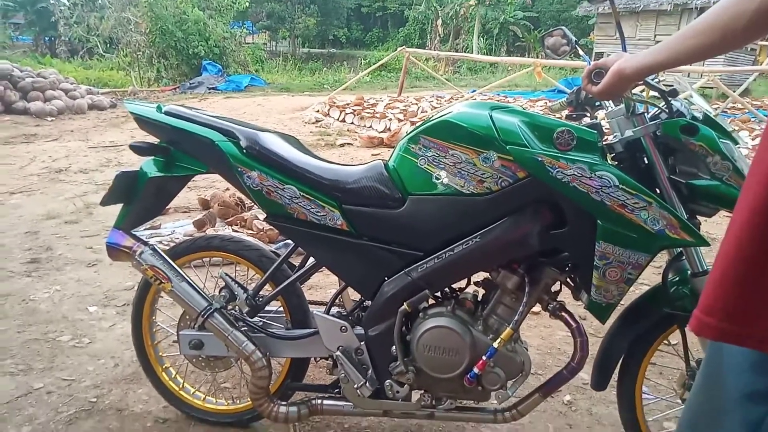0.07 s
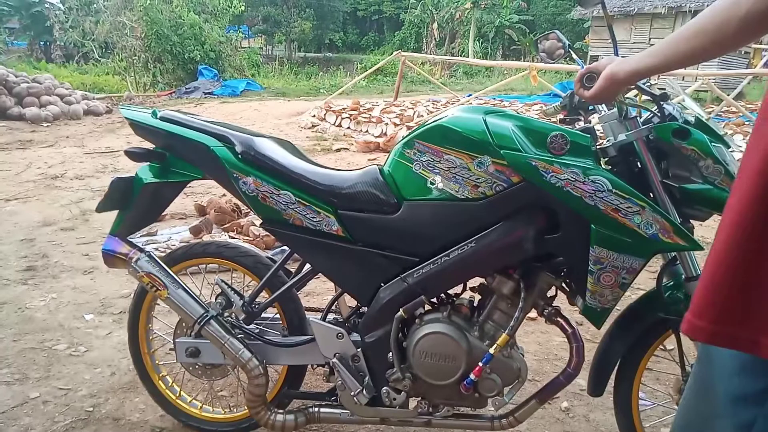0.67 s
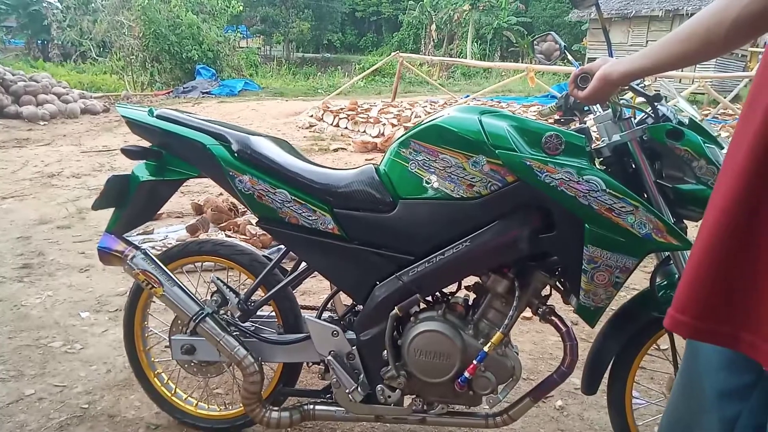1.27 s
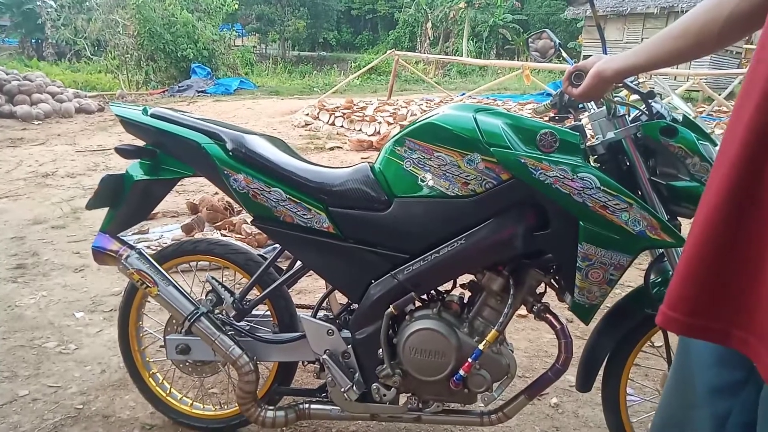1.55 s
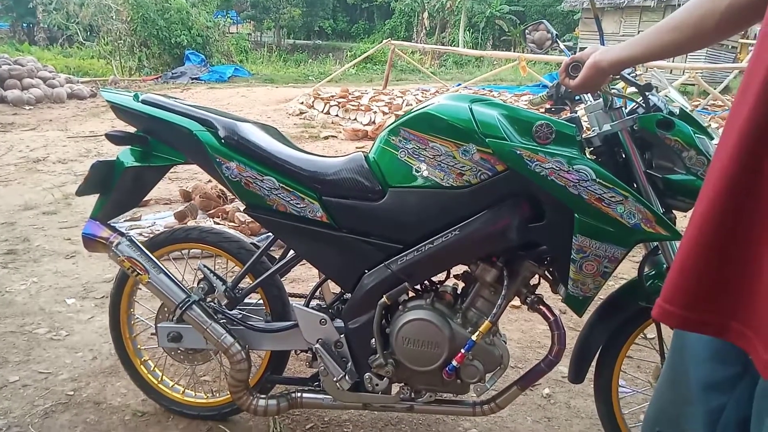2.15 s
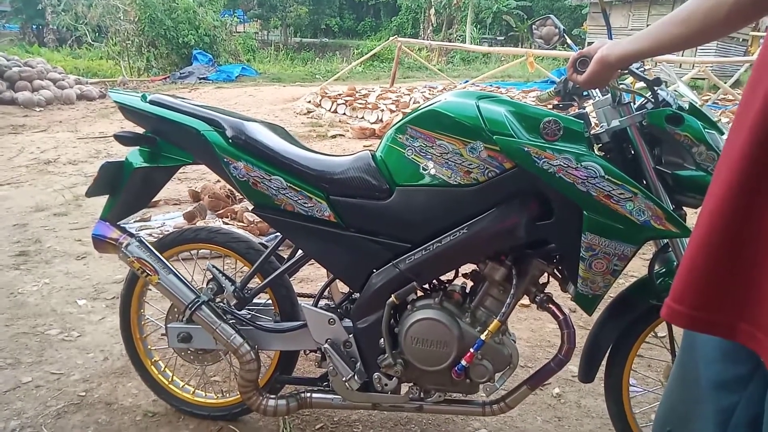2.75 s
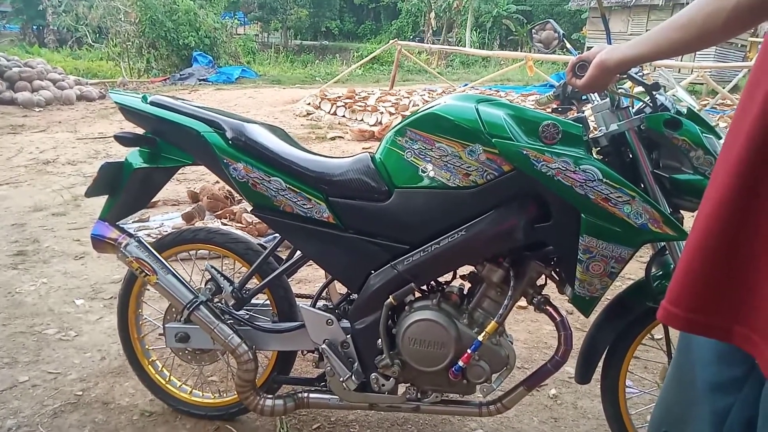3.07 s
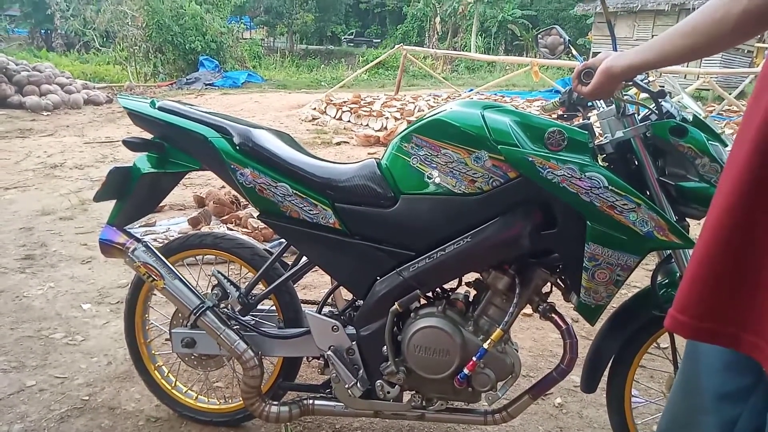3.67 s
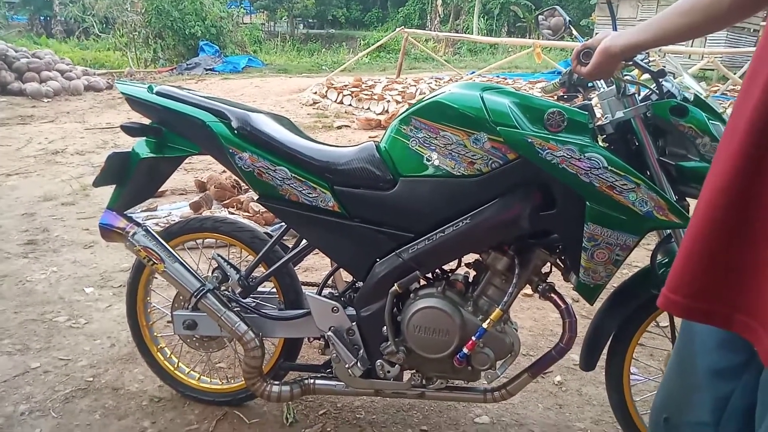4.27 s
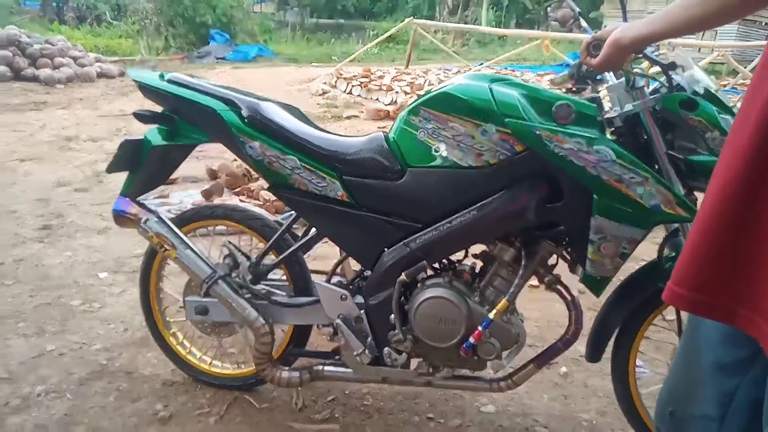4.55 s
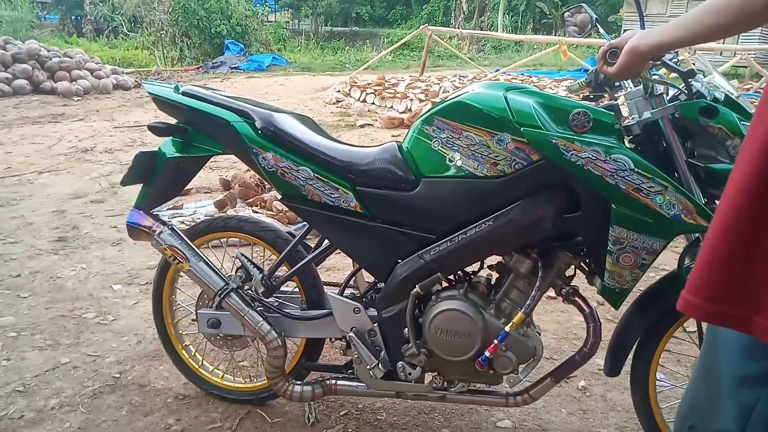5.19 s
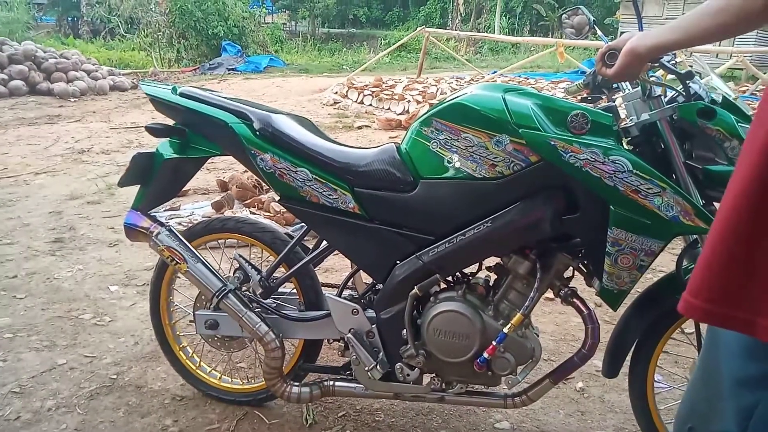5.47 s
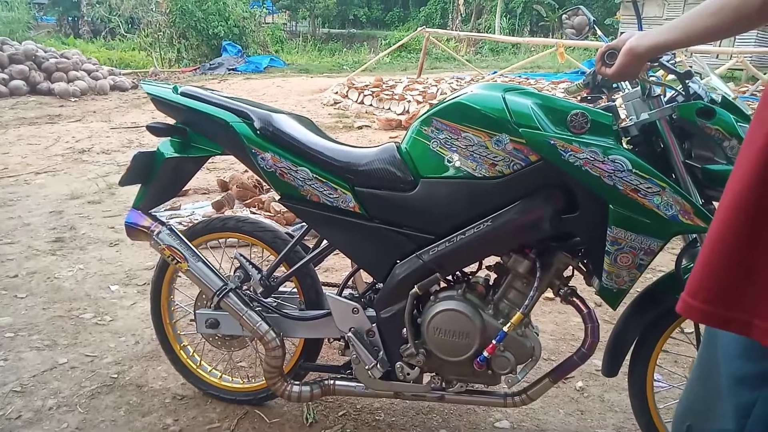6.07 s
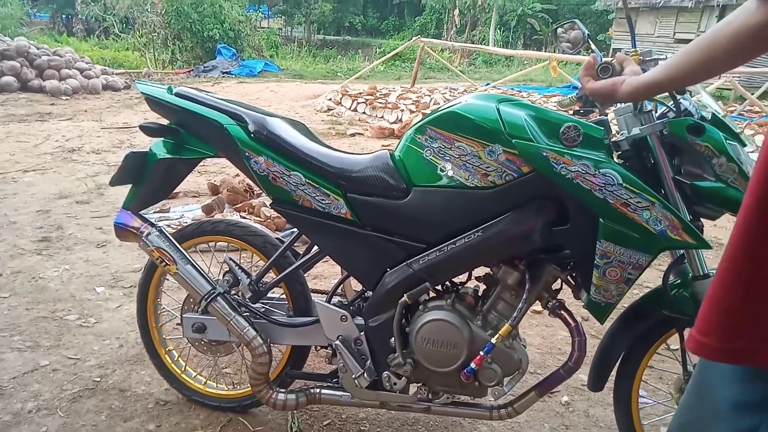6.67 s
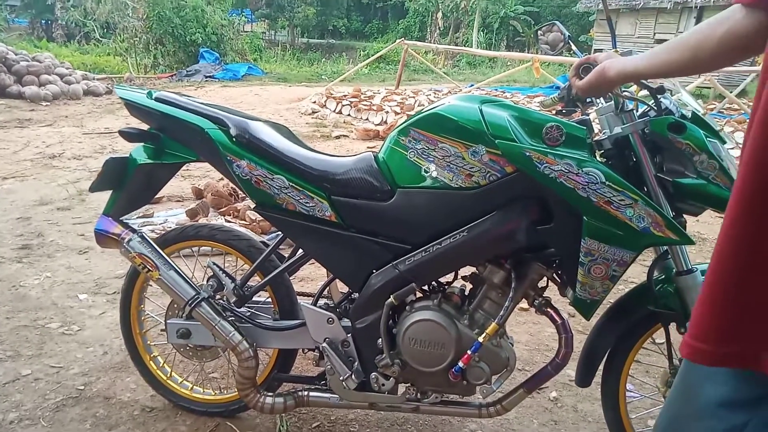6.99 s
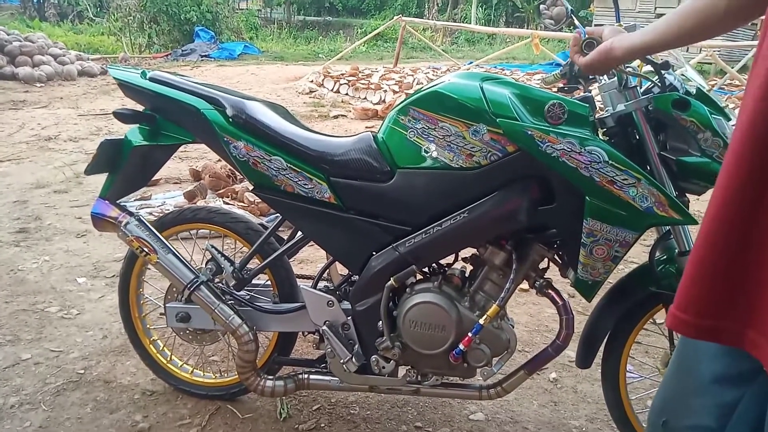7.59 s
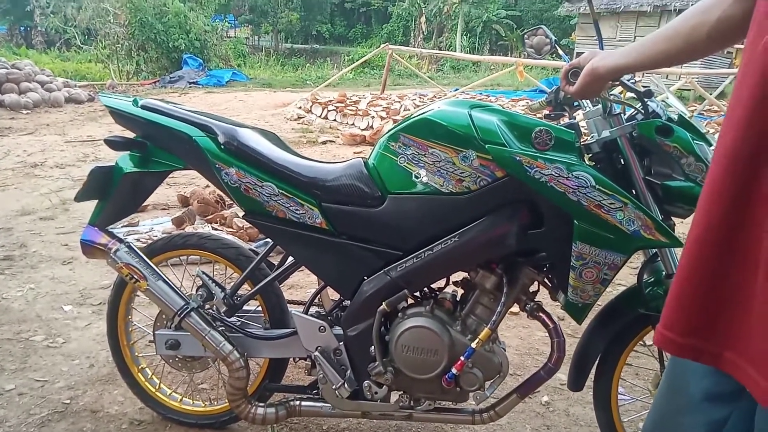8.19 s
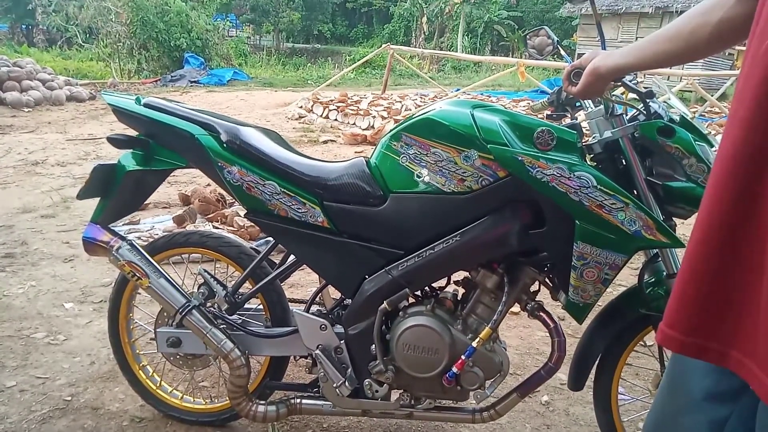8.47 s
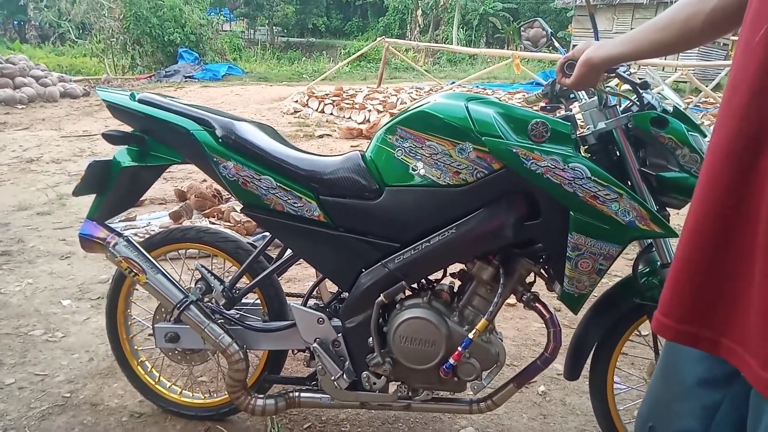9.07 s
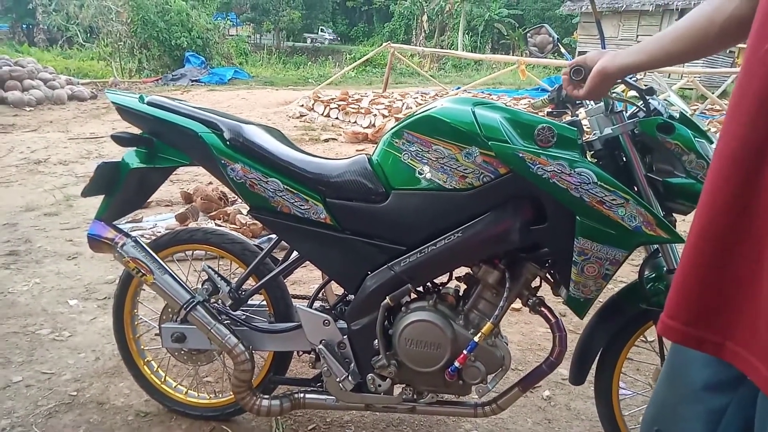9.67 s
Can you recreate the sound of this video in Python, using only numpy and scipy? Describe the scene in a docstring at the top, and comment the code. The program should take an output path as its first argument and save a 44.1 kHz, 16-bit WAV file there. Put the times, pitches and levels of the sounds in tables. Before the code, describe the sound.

A single-cylinder motorcycle idles loudly through an open exhaust, a few steps away in an outdoor yard with slight, short reflections. From the start it has a loping beat of about twelve hard bangs a second, each with a hollow pipe ring and a sharp, slightly metallic crack. Soft puffs fall between them, over a faint mechanical rustle. The pace creeps up until about 6.4 seconds, when the bangs stop and the engine coasts on duller puffs. At about 7 seconds the throttle is blipped once, a quick, harsh, raspy rev peaking near 7.2 seconds. The revs then fall with a crackling, popping burble until around 8 seconds. The loping idle returns just after that and holds until roughly 9.5 seconds, when the engine slows into softer puffs again, up to the end near 10 seconds.

```python
"""A loud, loping motorcycle idle in a yard: one cylinder banging through an open exhaust.
It fires only every other cycle. Each bang rings the pipe and returns from its far end as a sharp
crack; unfired cycles give soft puffs, with a mechanical rustle underneath. The engine coasts, is
blipped once, burbles down on the overrun as the pipe cools, lopes again and coasts once more."""
import sys
import numpy as np
from scipy import signal
from scipy.fft import rfft, irfft, next_fast_len
from scipy.io import wavfile
from scipy.ndimage import uniform_filter1d, minimum_filter1d

SR = 44100
rng = np.random.default_rng(int(sys.argv[2]) if len(sys.argv) > 2 else 0)


def write(x):
    x = np.atleast_2d(x).T
    wavfile.write(sys.argv[1], SR, np.round(np.clip(x, -1, 1) * 32767).astype(np.int16))


N = 433944

# Engine speed. Each row: time in seconds, four-stroke cycles per second.
ENGINE_SPEED = [(0.0, 23.91), (0.65, 23.74), (1.59, 23.17), (1.81, 23.91), (2.65, 23.85), (3.5, 24.92),
                (4.45, 24.75), (5.39, 26.42), (6.36, 27.66), (6.93, 18.77), (7.05, 26.88), (7.17, 41.25),
                (7.27, 41.9), (7.84, 30.35), (7.85, 28.5), (8.3, 23.2), (8.48, 25.16), (9.13, 25.57),
                (9.43, 25.4), (9.84, 19.13)]
# How far the throttle is open. Each row: time in seconds, added harshness in dB.
THROTTLE_OPENING = [(6.95, 0.5), (7.05, 5), (7.13, 11), (7.17, 20), (7.23, 10), (7.5, 3), (7.85, 5),
                    (8, 1.5)]
# Standing waves of the pipe. Each row: pitch in Hz, relative level in dB, t60 in seconds.
PIPE_MODES = [(73.3, -36, 0.16), (167.83, -12, 0.21), (242, -20.5, 0.12), (280.5, -24, 0.19),
              (345.2, -30, 0.22), (447.2, -18.5, 0.12), (478.5, -18, 0.12), (554.8, -13, 0.057),
              (657, -11, 0.052), (747.4, -30.5, 0.38), (769.2, -13, 0.11), (822.6, -31.5, 0.39)]
# Ringing of the silencer can. Each row: pitch in Hz, relative level in dB, t60 in seconds.
CAN_MODES = [(1010, -34, 0.045), (1253.4, -21.5, 0.071), (1366, -38, .16), (1490, -44.5, 0.053),
             (1565, -40, .16), (1701, -18, 0.019), (1775, -34, 0.11), (1910, -24.5, 0.033),
             (2014, -47, 0.25), (2076, -18.5, .012), (2227, -39.5, 0.047)]


def amp(db):
    """Decibels to gain."""
    return 10 ** (np.asarray(db) / 20)


def unit_rms(x):
    """Scales to rms 1."""
    return x / np.sqrt(np.mean(x ** 2) + 1e-20)


def curve_at(rows, at):
    """Value of a two-column curve at the given times."""
    return np.interp(at, *np.transpose(rows))


def colour(x, points):
    """Equalises by a curve of (Hz, dB) points."""
    size = next_fast_len(len(x) + 4096)
    hz, db = np.transpose(points)
    gain = amp(np.interp(np.log(np.fft.rfftfreq(size, 1 / SR) + 1), np.log(hz), db))
    return irfft(rfft(x, size) * gain, size)[:len(x)]


def lowpass(x, hz, order):
    """Rolls off the treble."""
    return signal.sosfilt(signal.butter(order, min(hz, SR / 2 - 1), fs=SR, output="sos"), x)


def add(mix, start_s, sound):
    """Mixes a sound in at start_s."""
    at = round(start_s * SR)
    part, sound = mix[max(at, 0):], sound[max(-at, 0):]
    part[:len(sound)] += sound[:len(part)]


def ring(modes, t):
    """Damped modes set going at t = 0."""
    hz, db, t60 = np.float32(modes).T[:, :, None]
    t = np.float32(np.maximum(t, 0))
    return (amp(db) * np.exp(-float(np.log(1000)) * t / t60) * np.sin(2 * np.pi * hz * t)).sum(0)


def crank():
    """Time, and the cycles that the engine has turned by then."""
    t = np.arange(-SR // 10, N, 20) / SR
    return t, np.cumsum(curve_at(ENGINE_SPEED, t)) * (t[1] - t[0])


def cycle_times(first_s, last_s, every):
    """Moments from first_s to last_s, about `every` engine cycles apart."""
    t, turns = crank()
    first, last = np.interp([first_s, last_s], t, turns)
    return np.interp(np.linspace(first, last, round((last - first) / every) + 1), turns, t)


def firings():
    """All the bangs. Each row: start in seconds, blow in dB, returning crack in dB."""
    # Runs of loping idle. Each row: first and last bang in seconds, blow in dB, crack in dB.
    lopes = [(-.003, 2.0278, .9, -1.5), (2.0882, 4.6218, .9, -.7), (4.7402, 4.7402, 1.5, -5),
             (4.8566, 4.9356, 1.3, 1.5), (5.0515, 6.3932, 1.4, -.5), (8.1368, 8.7916, 0, -2.5),
             (8.9096, 9.4595, .5, -2)]
    # The throttle blip: one row of the same kind.
    blip = (6.9665, 7.189, 1, -2)
    runs = [(cycle_times(*lope[:2], every=2), lope) for lope in lopes]
    runs.append((cycle_times(*blip[:2], every=1), blip))
    return np.array(sorted((s, *run[2:]) for times, run in runs for s in times))


def puff_times():
    """Every unfired cycle, between the bangs and after the last one."""
    t, turns = crank()
    fired = np.interp(firings()[:, 0], t, turns)
    between = [np.linspace(a, b, max(round(b - a), 1) + 1)[1:-1] for a, b in zip(fired, fired[1:])]
    coasting = np.arange(fired[-1] + 1, turns[-1])
    return np.interp(np.concatenate(between + [coasting]), turns, t)


def yard(x, wet_db=-8, t60=.15, echoes_per_s=2500):
    """Scattered reflections from the ground, the bike and nearby walls."""
    # Tone of the reflections. Each row: frequency in Hz, gain in dB.
    echo_eq = [(100, -21), (600, -4.5), (1200, -12.5), (2200, -13.5), (3500, 3), (6000, -23)]
    t = np.arange(SR // 4) / SR
    echoes = rng.standard_normal(len(t)) * (rng.random(len(t)) < echoes_per_s / SR)
    echoes *= (t > .002) * amp(-60 * t / t60)
    wet = signal.fftconvolve(x, echoes / np.linalg.norm(echoes))[:N]
    return amp(wet_db) * colour(wet, echo_eq)


def clatter(level_db=-44, valve_delay_s=.022, fade_s=.0067):
    """Mechanical rustle of the engine, swelling a little as a valve shuts in every cycle."""
    # Tone of the rustle. Each row: frequency in Hz, gain in dB.
    rustle_eq = [(30, -12), (100, 4), (700, 3.5), (1000, -8.5), (2000, -7), (3400, -10.5), (5000, -24.5),
                 (5700, -35.5), (6400, -28), (7200, -29.5), (10000, -37), (15000, -37)]
    t, swell = np.arange(SR // 20) / SR, np.ones(N)
    times = np.r_[firings()[:, 0], puff_times()]
    for s, size in zip(times, rng.random(len(times))):
        add(swell, s + valve_delay_s, size * np.exp(-t / fade_s))
    return amp(level_db) * unit_rms(swell * colour(rng.standard_normal(N), rustle_eq))


def ticks(level_db=16, fade_s=.0007):
    """Thin, bright ticks of noise riding on some of the cracks."""
    # Each row: start in seconds, relative level in dB.
    hits = [(0.5003, -46), (0.9218, -46), (1.1777, -45), (1.8607, -44), (2.0403, -35), (2.2662, -42),
            (2.3496, -46), (2.7574, -45), (3.5848, -43), (3.6656, -43), (3.9873, -44), (4.1495, -49),
            (4.2208, -44), (4.8663, -44), (5.9658, -45), (8.2297, -47)]
    t, out = np.arange(SR // 200) / SR, np.zeros(N)
    for s, db in hits:
        add(out, s, amp(db + level_db) * rng.standard_normal(len(t)) * np.exp(-t / fade_s))
    return lowpass(out, 9000, order=1)


def blowdown(t, dull_db, tuning, uneven_db, flow, push_s=.000887):
    """A short push of gas leaves the pipe, whose standing waves then swing the other way."""
    hz, db, t60 = np.transpose(PIPE_MODES)
    db = db - dull_db * np.log2(hz / hz[1]) + uneven_db  # dull_db is a loss per octave
    t60 = t60 / (1 + abs(flow) * (hz / hz[-1]))  # streaming gas damps the upper waves
    waves = ring(np.transpose([hz * tuning, db, t60]), t - push_s)
    push = .49 * amp(-2 * max(dull_db, 0)) * np.sin(np.pi * np.minimum(t / push_s, 1))
    build_up = 1 - np.exp(-np.maximum(t - push_s, 0) / .00036)
    return push - waves * build_up


def pipe_crack(t, trip_s=.01119, width_s=.00021):
    """A wave runs the pipe, steepens to a spike and rings the can after trip_s."""
    late = t - trip_s
    spike = .56 / (1 + (late / width_s) ** 2) ** 2
    return spike + ring(CAN_MODES, late)


def gust(t, crack_db, trip_s=.011, fade_s=.031, flare_s=.012, flare_db=9):
    """Envelope of the turbulent jet: it starts with the blow and flares with the returning wave."""
    flare = amp(flare_db + crack_db) * (t > trip_s) * np.exp(-abs(t - trip_s) / flare_s)
    return (np.exp(-t / fade_s) + flare) * (1 - np.exp(-t / .0004))


def puffs(t, idle_hz=25, cool_s=.55, cold_sag=.115, flow=2.2, rasp_db=-7, burble_db=-29):
    """Unfired cycles, duller when the engine is slow and the pipe cold: pipe sound and jet envelope."""
    # Strength of the puffs. Each row: time in seconds, blow in dB.
    puff_levels = [(0, -8), (6.38, -7.5), (6.46, -.5), (6.7, -4.5), (6.9, -1.5), (7.22, -6.5), (7.55, -3.5),
                   (7.9, 1.5), (8.12, -6.5), (9.45, -4), (9.84, -1.5)]
    # Unburnt fuel catching in the pipe, faint but for the overrun. Each row: time in seconds, gain in dB.
    late_burns = [(7.17, -29), (7.22, -11), (7.3, -6.5), (7.42, -7), (7.54, -11), (7.68, -1.5), (7.85, 1),
                  (7.92, -16), (8.1, -29)]
    # Tone of the churning gas. Each row: frequency in Hz, gain in dB.
    burble_eq = [(40, -17), (65, 10), (110, 0.5), (220, 2.5), (400, -4), (800, -9), (950, -31), (3000, -49)]
    pipe, jet, churn = np.zeros((3, N))
    fired, hz = firings()[:, 0], np.array(PIPE_MODES)[:, 0]
    crack = amp(-2.5) * pipe_crack(t, trip_s=.0004)
    swirl = gust(t, crack_db=-3)
    for s in puff_times():
        uneven_db = rng.standard_normal(len(hz))
        stray, detune = rng.standard_normal(2)
        blow_db, burn_db = curve_at(puff_levels, s), curve_at(late_burns, s)
        speed = curve_at(ENGINE_SPEED, s)
        cold = min((s - fired[fired < s][-1]) / cool_s, 1)  # the gas cools after the last bang
        dull_db = 4.5 - 8.5 * np.log2(speed / idle_hz) + 2 * cold
        slack = np.clip(dull_db / 6, 0, 1)  # dull puffs are rounder, less even and churn more
        sag = cold_sag * cold * np.minimum(hz[1] / hz, 1)  # the deep waves drop most in pitch
        tuning = 1 - sag + .025 * slack * detune
        puff = blowdown(t, dull_db, tuning, slack * uneven_db, flow)
        add(pipe, s, amp(blow_db) * lowpass(puff, 2000 / (1 + 3.8 * slack), order=2))
        # half a cycle on, a late burn cracks and rings the pipe again
        rebound = amp(-3) * blowdown(t, -1.2, tuning, slack * uneven_db, flow)
        add(pipe, s + .5 / speed + .0002 * stray, amp(burn_db) * (rebound + crack))
        add(jet, s, amp(rasp_db + burn_db + curve_at(THROTTLE_OPENING, s)) * swirl)
        add(churn, s, slack * amp(blow_db) * swirl)
    burble = amp(burble_db) * churn * unit_rms(colour(rng.standard_normal(N), burble_eq))
    return pipe + burble, jet


def bangs(t, blow_spread_db=.7, crack_spread_db=1.8, slap_db=-20, roar_db=-28, roar_s=.007):
    """Hard firings, thinner, brighter and drier on an open throttle: pipe sound and jet envelope."""
    pipe, jet = np.zeros((2, N))
    # the returning wave also rings the upper pipe modes a second time
    second_ring = blowdown(np.maximum(t - .0105, 0), dull_db=-2, tuning=1, uneven_db=0, flow=1)
    crack = pipe_crack(t) + amp(-13) * second_ring
    can_slap = ring(CAN_MODES, t - .001)  # the first push already slaps the can
    for s, blow_db, crack_db in firings():
        detune, hard, sharp = rng.standard_normal(3)  # no two firings burn alike
        uneven_db = rng.standard_normal(len(PIPE_MODES))
        open_db = curve_at(THROTTLE_OPENING, s)
        blow_db += blow_spread_db * hard - .15 * open_db
        crack_db += crack_spread_db * sharp - .4 * open_db
        blow = blowdown(t, dull_db=1 - .3 * open_db, tuning=1 + .014 * detune,
                        uneven_db=uneven_db, flow=.25 + .2 * open_db)
        blow += amp(slap_db + open_db) * can_slap
        gas_roar = amp(roar_db + open_db) * np.exp(-t / roar_s) * rng.standard_normal(len(t))
        add(pipe, s, amp(blow_db) * blow + amp(crack_db) * crack + gas_roar)
        add(jet, s, amp(blow_db + .75 * open_db) * gust(t, crack_db - open_db))
    return pipe, jet


def exhaust(rasp_db=-40, muffle_hz=3600):
    """Bangs and puffs through the pipe, with the rasp of the turbulent jet."""
    # Tone of the rasp. Each row: frequency in Hz, gain in dB.
    rasp_eq = [(100, -26), (400, -6), (800, -2.5), (1200, -2), (1900, -1.5), (2600, -6.5), (3500, -12),
               (4500, -21.5), (5600, -34), (6800, -31.5), (8000, -26), (9500, -35), (15000, -32.5)]
    t = np.arange(SR // 7) / SR
    pipe, jet = np.add(bangs(t), puffs(t))
    rasp = amp(rasp_db) * jet * unit_rms(colour(rng.standard_normal(N), rasp_eq))
    return lowpass(pipe, muffle_hz, order=6) + rasp


def scene():
    """The motorcycle a few steps away, outdoors."""
    pipe = exhaust()
    return (pipe + yard(pipe) + clatter() + ticks())[None]


def record(dry, ceiling=.97, top_hz=15600):
    """A small microphone that cuts the deep bass, a quick peak limiter, then a steep treble cut."""
    # Tone of the microphone. Each row: frequency in Hz, gain in dB.
    microphone_eq = [(20, -26), (40, -22), (51, -16), (62, 2.5), (95, 8.5), (150, 1.5), (350, 3.5),
                     (800, 0), (2500, 0.5), (15000, -9.5)]
    x = colour(dry[0], microphone_eq)
    gain = minimum_filter1d(np.minimum(1, ceiling / (abs(x) + 1e-9)), 161)
    limited = x * uniform_filter1d(uniform_filter1d(gain, 81), 81)
    treble_cut = signal.firwin(511, top_hz, window=("kaiser", 9), fs=SR)
    return signal.oaconvolve(limited, treble_cut, "same")[None]


dry = scene()
out = record(dry)
write(out)
```